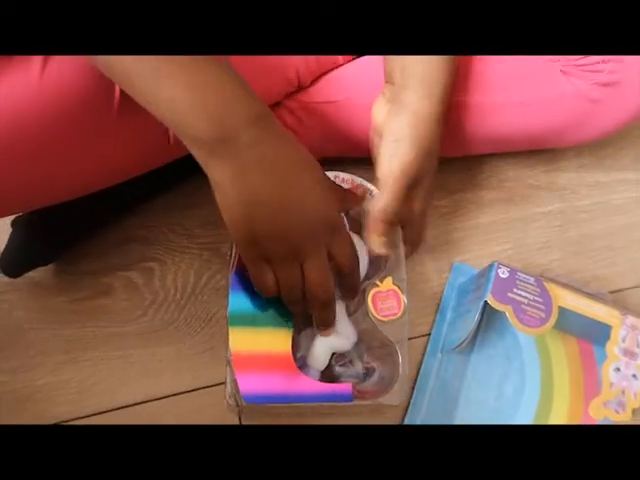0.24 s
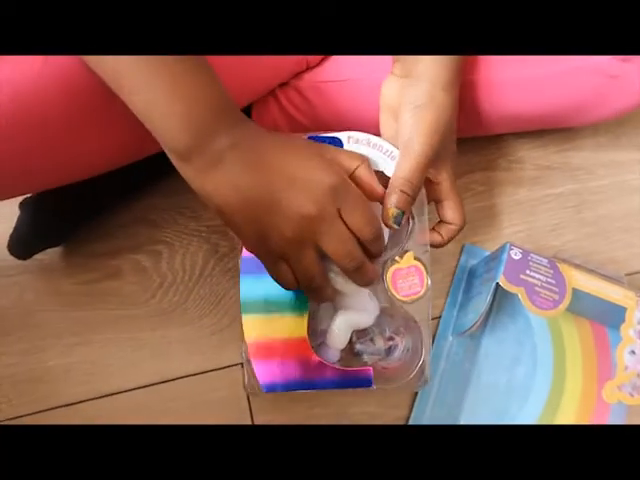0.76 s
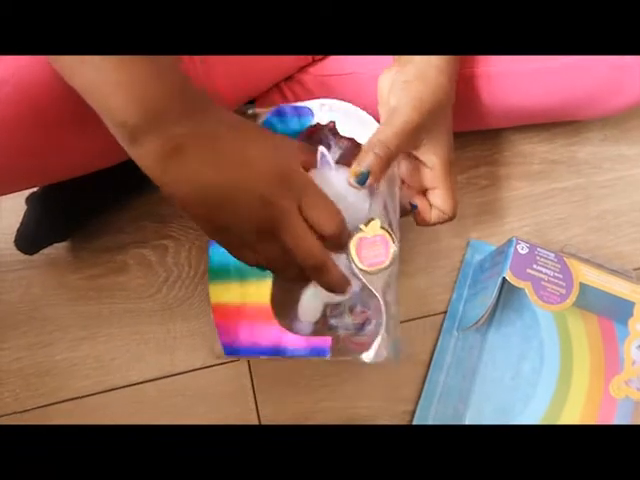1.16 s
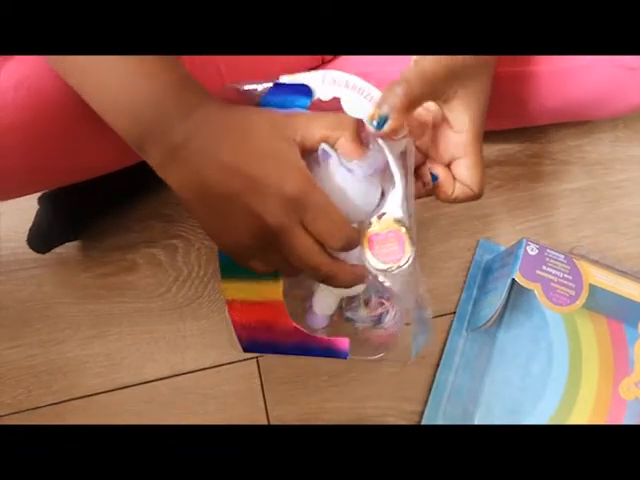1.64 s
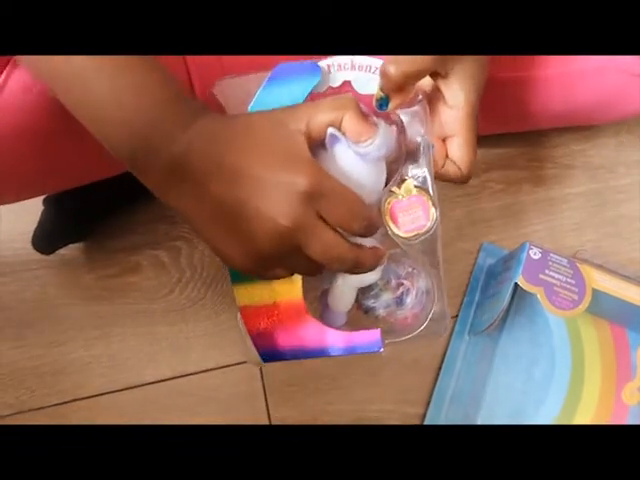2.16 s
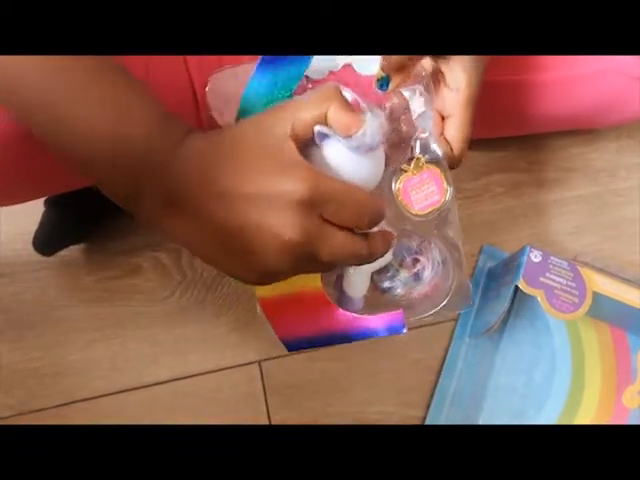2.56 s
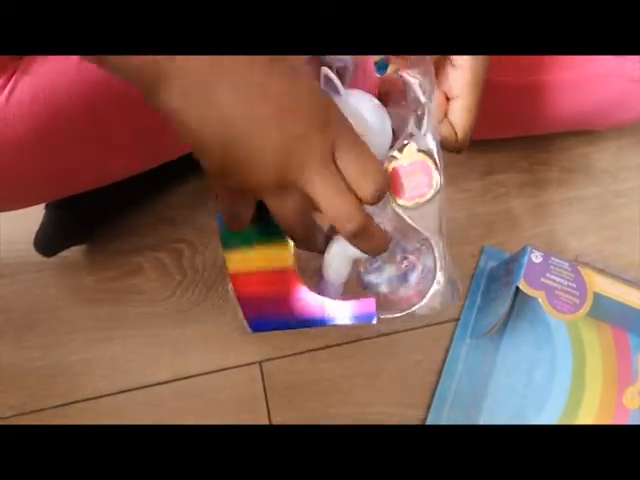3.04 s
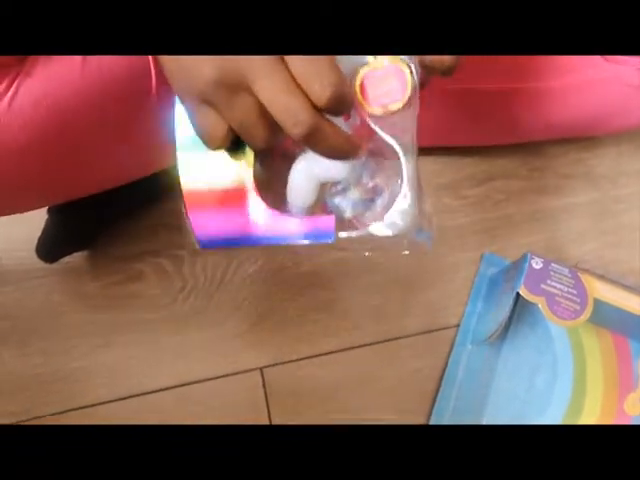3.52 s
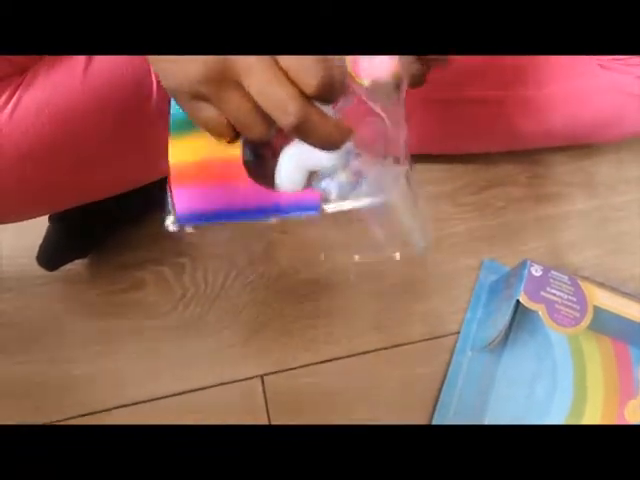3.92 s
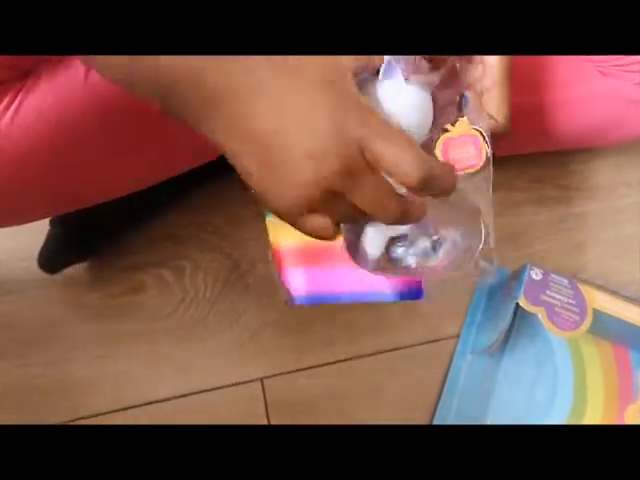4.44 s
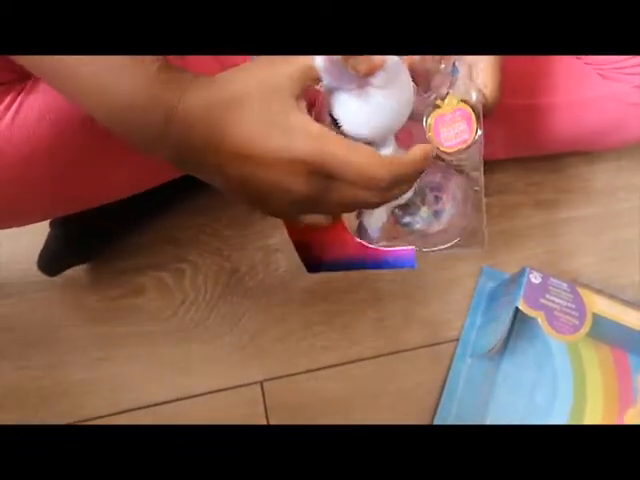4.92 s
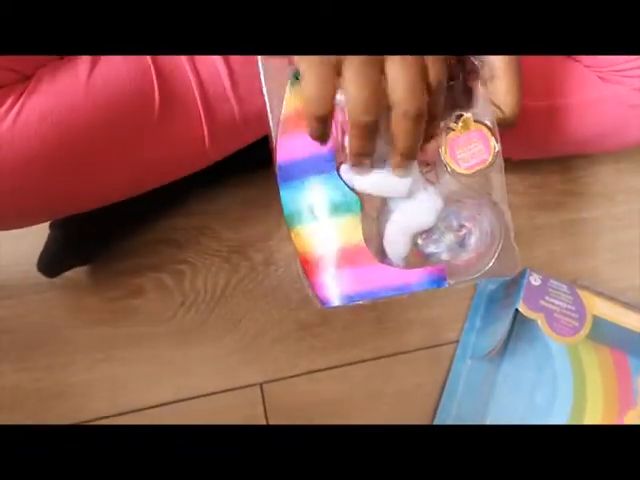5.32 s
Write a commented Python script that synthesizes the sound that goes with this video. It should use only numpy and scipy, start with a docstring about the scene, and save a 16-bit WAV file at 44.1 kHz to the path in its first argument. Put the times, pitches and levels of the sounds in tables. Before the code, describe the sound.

Stiff clear plastic packaging crackles, pops and crinkles close up as hands flex and squeeze it in a small hard-floored room.

```python
"""Hands work a stiff clear plastic tray close to a two-port microphone, in a small hard-floored room.
Air noise and rumble lie under it all; creaks (sticking slips) and rustle (ticking noise) come and go.
From 0.1 s the sheet buckles, each time a ringing thump, a torn crack and a sizzle, some in small flurries;
a ratchet of even buckles runs at 0.8 s, hard snaps overload the input near 1.1 and 2.0 s, and damped rim
modes scrape at 2.4 s. Buckles crowd from 3 to 4.6 s, the rim scrapes again, and the last buckles thin out."""
import sys
import numpy as np
from scipy import signal
from scipy.fft import rfft, irfft, next_fast_len
from scipy.io import wavfile
from scipy.ndimage import map_coordinates

SR = 44100
rng = np.random.default_rng(int(sys.argv[2]) if len(sys.argv) > 2 else 0)


def unload_audio(sound):
    """Save the sound as a 16-bit wav file, at the path given as the first command line argument."""
    columns = np.transpose(np.atleast_2d(sound))
    # keep every value between -1 and 1, then stretch to whole-number steps
    steps = np.round(np.clip(columns, -1, 1) * 32767)
    wavfile.write(sys.argv[1], SR, steps.astype(np.int16))


N = 246078
RISE_S = .00035  # time constant of the onset of buckles and rim slips


def amp(db):
    """Decibels to gain."""
    return 10 ** (np.asarray(db) / 20)


def unit(x):
    """Scaled to rms 1."""
    return x / np.sqrt(np.mean(x ** 2) + 1e-20)


def along(points, hz):
    """Values between (frequency, value) points on a log frequency axis."""
    f, v = np.transpose(points)
    return np.interp(np.log(hz + 1e-9), np.log(f), v)


def curves(rows):
    """One value per sample for each column after the time."""
    s, *cols = np.transpose(rows)
    return [np.interp(np.arange(N) / SR, s, c) for c in cols]


def filtered(x, response):
    """x times a complex response of frequency."""
    m = next_fast_len(x.shape[-1] + 8192)
    spectrum = rfft(x, m) * response(np.fft.rfftfreq(m, 1 / SR))
    return irfft(spectrum, m)[..., :x.shape[-1]]


def noise(spectrum, shape):
    """Coloured noise of rms 1."""
    return unit(filtered(rng.standard_normal(shape), lambda hz: amp(along(spectrum, hz))))


def onset(t):
    """Smooth start of a burst, from 0 towards 1."""
    return (1 - np.exp(-t / RISE_S)) ** 2


# colour of the air noise in the room: (frequency [Hz], relative density [dB])
AIR_COLOUR = [(200, -3.5), (400, -1.5), (1700, -21), (5000, -21.5), (12000, -31.5), (16000, -39)]
# low rumble under the handling: (time [s], level [dB])
RUMBLE_LEVEL = [(0, -48.5), (1.9, -55.5), (2.1, -60), (3.2, -56.5), (3.8, -55), (4.3, -54), (4.6, -81),
                (5.58, -53)]


def room_tone():
    """Steady air noise and a low rumble that comes and goes, both as filtered noise."""
    rumble_colour = [(10, -31), (30, 4.0), (120, 1.5), (200, -3.0), (300, -20.0), (1000, -88.0)]
    rumble = noise(rumble_colour, (2, N))
    air = amp(-57.5) * noise(AIR_COLOUR, (2, N))
    return air + amp(curves(RUMBLE_LEVEL)[0]) * rumble


# how long the small hard-floored room rings: (frequency [Hz], time to fall 60 dB [s])
ROOM_DECAY = [(200, 0.054), (600, 0.17), (3000, 0.33), (7000, 0.21), (12000, 0.071)]


def room(x, delay):
    """Each frequency dies at its own speed; every stretch of sound meets a slightly different room."""
    out, step = np.zeros((2, N + SR)), SR // 8
    for start in range(0, N, step):
        hz, t, z = signal.stft(rng.standard_normal((2, SR // 3)), SR, nperseg=256)
        decay = amp(-60 * t / along(ROOM_DECAY, hz)[:, None])
        tail = signal.istft(z * decay, SR, nperseg=256)[1]
        tail = tail / np.linalg.norm(tail[0])
        wet = signal.fftconvolve(x[:, start:start + step], tail, axes=1)
        out[:, start + round(delay * SR):][:, :wet.shape[1]] += wet
    return out[:, :N]


def slips(rate, spread_db):
    """Random impulses, rate a second, a few much larger than the rest."""
    hit, size, sign = rng.random((3, N))
    return unit((hit < rate / SR) * amp(-spread_db * np.log(size + .02)) * np.sign(sign - .5))


# hands on the tray: (time [s], relative creak level [dB], relative rustle level [dB])
GRIP_LEVELS = [(0.0, -100, -62), (0.16, -34, -36), (0.44, -41.5, -47.5), (0.63, -40.5, -40),
               (0.78, -44.5, -59), (0.97, -39.5, -38.5), (1.1, -45.5, -53), (1.4, -39, -44),
               (1.58, -50.5, -55), (1.7, -48.5, -48), (2.01, -50, -46), (2.36, -44, -49),
               (2.47, -52.5, -51), (2.57, -39.5, -60), (2.72, -38, -50), (2.86, -37, -43.5),
               (2.96, -51, -47), (3.1, -39.5, -38.5), (3.24, -37, -43), (3.31, -39.5, -46),
               (3.42, -53, -46), (3.6, -43.5, -65), (3.82, -38.5, -62.5), (4.03, -36.5, -24.5),
               (4.15, -43.5, -44), (4.21, -36.5, -43), (4.25, -39, -44.5), (4.43, -43.5, -64),
               (4.53, -34, -44.5), (4.74, -62, -64), (4.9, -57, -59), (5.01, -51, -56), (5.08, -40, -44),
               (5.58, -46, -54)]
# resonances of the tray under the fingers: (frequency [Hz], width [Hz], relative level [dB])
TRAY_MODES = [(353, 200, 9), (750, 390, 5.5), (1596, 240, 1), (2680, 2000, -15)]
# colour of the rustling sheet: (frequency [Hz], relative density [dB])
RUSTLE_COLOUR = [(1000, -6), (2000, -5.5), (3000, -7), (5000, -18), (8000, -24), (12000, -32), (16000, -39)]


def fingers():
    """Skin sticks and slips in clumps: low creaks through the tray, fine ticks from the sheet."""
    creak_db, rustle_db = curves(GRIP_LEVELS)
    # slow random drag, 40 points a second
    drag = map_coordinates(rng.standard_normal(N * 40 // SR + 4), [np.arange(N) * 40 / SR])

    def tray_and_skin(f):
        tray = sum((-1) ** k * amp(db) * 1j * f * width / (centre ** 2 - f * f + 1j * f * width)
                   for k, (centre, width, db) in enumerate(TRAY_MODES))
        return tray / (1 + 1j * f / 3500) ** 2  # fingertips are soft

    creak = filtered(slips(rate=600 * amp(3.3 * drag), spread_db=2.0), tray_and_skin)
    creak = unit(amp(3 * drag) * creak)
    tick_hits = np.abs(slips(rate=200 * amp(4.3 * drag), spread_db=8.0))
    ticks = np.convolve(tick_hits, np.hanning(130), "same")  # each window spans 3 ms
    rustle = (unit(ticks) + 2.9) * noise(RUSTLE_COLOUR, (2, N))
    rustle = unit(amp(2.4 * drag) * rustle)
    return amp(creak_db + 5.0) * creak + amp(rustle_db - 2.5) * rustle


# runs of rim slips: (mean slope of the modes [dB per octave], slips as (time [s], relative level [dB]))
RIM_SLIPS = [(-3, [(2.396, -30), (2.43, -25), (2.45, -24), (2.464, -38), (2.471, -27), (2.489, -23),
             (2.5035, -29), (2.522, -24)]), (-7.5, [(4.7761, -23.5), (4.784, -22), (4.793, -24),
             (4.831, -23), (4.8417, -23), (4.85, -19), (4.857, -27), (4.8646, -25), (4.87, -25),
             (4.876, -20), (4.886, -16.5), (4.894, -21), (4.9057, -23), (4.912, -24), (4.92, -20),
             (4.9355, -22), (4.942, -20), (4.9465, -22), (4.95, -33), (4.955, -23), (4.96, -26),
             (4.965, -43), (4.97, -25), (4.976, -36)])]
# damped modes of the rim: (nominal frequency [Hz], relative level [dB], time to fall 60 dB [s])
RIM_MODES = [(724, 4.5, 0.0071), (1770, -9, 0.02), (2430, -3.5, 0.0083), (3810, -0.5, 0.0064)]


def rim():
    """Each slip rings the same damped modes, a little detuned, the upper ones varying in level."""
    out, t = np.zeros(N), np.arange(1024) / SR
    hz, level_db, t60 = np.transpose(RIM_MODES)[:, :, None]
    octaves = np.log2(hz / hz[0])
    for slope_db, rows in RIM_SLIPS:
        lots = rng.standard_normal((len(rows), 2, len(RIM_MODES), 1))
        for (s, db), (tilt, detune) in zip(rows, lots):
            mode_db = db + 6 + level_db + octaves * (slope_db + tilt)
            gain = amp(mode_db - 60 * t / t60) * onset(t)
            modes = gain * np.sin(2 * np.pi * hz * (1 + .03 * detune) * t)
            out[round((s - .001) * SR):][:len(t)] += np.sum(modes, axis=0)
    return out


# a rim juddering past: (first time [s], end time [s], gap [s], relative thump level [dB], swell [dB],
# crack over thump [dB], sizzle over thump [dB], hollow pitch [Hz], crack centre [Hz])
RATCHET_RUNS = [(0.8165, 0.905, 0.0277, -30, 8, 7, -18, 850, 1700)]


def ratchets():
    """Runs of nearly evenly spaced small buckles that swell or fade."""
    judder_s, judder_db = 0.0008, 1  # random spread of time and level
    rows = []
    for first, last, gap, db, swell_db, *colour in RATCHET_RUNS:
        lot = rng.standard_normal((32, 2))
        for s, (late, size) in zip(np.arange(first, last, gap), lot):
            swollen_db = db + swell_db * (s - first) / (last - first)
            rows.append((s + judder_s * late, swollen_db + judder_db * size, *colour))
    return rows


# folds collapsing: (middle time [s], length [s], mean relative thump level [dB],
# mean crack over thump [dB], mean sizzle over thump [dB], nominal hollow pitch [Hz])
FOLDS = [(0.192, 0.08, -34.5, -9, -8, 856), (0.302, 0.045, -22.5, -10, -13.5, 977),
         (0.56, 0.054, -20.5, -12, -24, 883), (0.621, 0.083, -27.5, -1, -12, 430),
         (0.956, 0.086, -27.5, -24, -38, 702), (1.635, 0.039, -33, -17, -20, 762),
         (1.708, 0.05, -21.5, -4.5, -22, 883), (2.864, 0.059, -27, -8, -40, 714),
         (3.134, 0.026, -51, 19, 8, 765), (3.231, 0.062, -28.5, -1, -10.5, 756),
         (3.424, 0.053, -25, -10, -33, 592), (3.989, 0.054, -35, 6.5, 4.5, 595),
         (5.096, 0.041, -23.5, -9, -23, 702), (5.15, 0.024, -29.5, 3, -11, 867),
         (5.303, 0.05, -30.5, -13.5, -24, 715), (5.499, 0.071, -28.5, -10, -20, 750)]


def crinkles():
    """A fold collapses in a flurry of small buckles at chance times, levels and pitches."""
    flurry, crack_hz = 18, 2480  # buckles per fold, nominal crack centre
    spread_db, spread_pitch = 2.5, 0.12  # pitch spread as a log ratio
    rows = [(s + length * (u - .5), *rest) for s, length, *rest in FOLDS for u in rng.random(flurry)]
    s, *levels, hollow_hz = np.transpose(rows)
    lot = rng.standard_normal((len(rows), 5)).T
    pitch = np.array([hollow_hz, np.full(len(s), crack_hz)]) * np.exp(spread_pitch * lot[3:])
    return list(np.vstack([s + .001, levels + spread_db * lot[:3], pitch]).T)


# single buckles: (peak time [s], relative thump level [dB], crack over thump [dB],
# sizzle over thump [dB], pitch of the bent hollow [Hz], crack centre [Hz])
SHEET_BUCKLES = [(0.108, -17, -6, -19, 700, 1950), (0.123, -19, -16, -14, 854, 1880.0),
                 (0.148, -23, 2.5, -22, 1050, 1750.0), (0.21, -49.5, 29, -17, 830, 2030),
                 (0.297, -20, -18, -21, 990, 1690), (0.309, -3, -3.5, -2, 955, 3360),
                 (0.401, -17.5, -5, -28, 805, 1650.0), (0.493, -19.5, -1, -12, 726, 2550),
                 (0.505, -16, -6.5, -16.5, 954, 1950), (0.584, -5.5, 0.5, -13, 430, 2900),
                 (0.603, -8.5, -14, -27, 420, 1880.0), (0.613, -24, -10, -23, 407, 2000),
                 (0.632, -12, -6.5, -23, 770, 1720), (0.719, -17.5, -9.5, -17, 737, 3080),
                 (0.879, -26, -22, -41, 743, 4300), (0.922, -22.5, -7, -62, 870, 3950),
                 (0.936, -14, -22, -39, 740, 2090.0), (0.981, -14.5, -18, -36, 710, 3500),
                 (1.012, -15.5, -13, -24, 525, 1860.0), (1.0942, -30, 18, 5, 860, 2900),
                 (1.0955, 4.5, -2.5, -10.5, 697, 2400), (1.0975, -17, -16, 8.5, 600, 2550),
                 (1.251, -29, 5.5, -28, 800, 2500), (1.286, -29.5, 7.5, -5, 763, 2400),
                 (1.301, -24, 5, -11, 995, 2230), (1.373, -22, -19, -32, 775, 2190.0),
                 (1.394, -18.5, -12, -2.5, 560, 2200.0), (1.401, -12.5, -6, -16, 906, 2600),
                 (1.439, -5, -2.5, -21, 721, 2390), (1.694, -16, 8, -13, 1093, 2900),
                 (1.707, -9.5, -14, -5.5, 954, 2620.0), (1.731, -35, -8, -30, 730, 2170),
                 (1.888, -26.5, 0.5, -7.5, 800, 2850), (1.937, -11.5, -1, -20, 683, 2900),
                 (1.933, -31.5, 0, -26, 665, 2020), (1.975, -20, -14, -25, 750, 2000),
                 (1.982, -42, 14, 0, 800, 3000), (1.9875, -5, 9, -7, 772, 1600),
                 (1.987, -1.5, 9, -1, 882, 3270), (2.087, -22, -4, -30, 654, 2000),
                 (2.122, -25, 15, -7.5, 1180, 1580), (2.133, -24, 6.5, -26, 990, 2830),
                 (2.187, -24.5, 1, -32, 750, 1850), (2.208, -33, 5, -28, 780, 2530),
                 (2.231, -25, -6, -30, 980, 1920), (2.264, -7.5, 7.5, -6, 597, 2900),
                 (2.402, -22.5, -1.5, -11, 750, 3240), (2.549, -21, -3, -11, 717, 2120),
                 (2.587, -25.5, 7.5, -8, 690, 2600), (2.61, -6, 4.5, -11.5, 914, 2960),
                 (2.693, -10, -6, -17, 520, 1800), (2.741, -20.5, -10, -34, 620, 1890.0),
                 (2.766, -10, -5, -27, 567, 2120), (2.797, -9, -10.5, -32, 827, 2010.0),
                 (2.866, -17, -6, -30, 720, 2220), (2.88, -22.5, 6, -28, 760, 2320),
                 (2.887, -13, 1, -2, 680, 2320), (2.958, -29, 0, -9, 634, 2410),
                 (2.981, -25, -14, -27, 850, 2000), (3.0, -20, 3, -29, 670, 3200),
                 (3.025, -8.5, -3, -29, 612, 1830), (3.041, -31.5, 16, 7, 780, 2550),
                 (3.057, -18.5, -5, 2, 650, 2570), (3.068, -17, 0, -18, 840, 2140.0),
                 (3.145, -34.5, 21.5, 18, 1090, 2740), (3.155, -1, -6.5, -21.5, 535, 1650),
                 (3.169, -10.5, -1.5, -14, 860, 1790), (3.199, -17.5, 1, -3.5, 850, 2500),
                 (3.203, -26, 23.5, 11, 1040, 2300), (3.252, -37, 12, -15, 785, 2800),
                 (3.266, -23, 8, -21, 636, 2660), (3.325, -28, -13, -23, 610, 1800),
                 (3.34, -15.5, -2, -11, 696, 2660), (3.359, -12.5, -3, -32, 448, 2640),
                 (3.395, -19, 0, -8.5, 680, 3030), (3.41, -13, -6, -10, 710, 2460),
                 (3.425, -22, -1, -15, 557, 2160), (3.461, -17, -13, -6, 680, 3000),
                 (3.481, -21, -5, -28, 570, 1700), (3.466, -12, -5, -22, 644, 2840),
                 (3.497, -13.5, -9, -27.5, 563, 2320), (3.53, -16.5, -1, -17, 730, 2620),
                 (3.566, -15.5, -2, -27, 552, 1910.0), (3.578, -26, 11.5, -5.5, 920, 2500),
                 (3.618, -19, 1, -19.5, 700, 3080), (3.623, -6, -15, -34, 587, 2380),
                 (3.666, -12.5, 0, -33, 450, 1750), (3.679, -6.5, -7, -14, 700, 3300),
                 (3.688, -5.5, 8, -4, 1275, 1430), (3.772, -22.5, 4.5, -21, 474, 1710),
                 (3.808, -31, 2, -1.5, 880, 2510), (3.88, -30, 12, -20, 690, 1970),
                 (3.897, -30.5, -9, 13, 800, 3000), (3.96, -22, -6, -5, 725, 2500),
                 (4.004, -9.5, -14, -44, 177, 2020), (3.847, -31.5, 14.5, -27, 660, 1610),
                 (3.889, -10, 8, -19.5, 716, 2700), (3.929, -9, -1.5, -15.5, 1564, 1650),
                 (3.952, -11.5, 4.5, -15, 530, 2050), (4.001, -8, -6, -14, 410, 1980),
                 (4.009, -14.5, 6.5, 6.5, 1110, 1540), (4.019, -6.5, 1, -4.5, 827, 2140),
                 (4.026, -5, -3.5, -3, 673, 2450), (4.1005, -20.5, 7.5, 0, 804, 2880),
                 (4.108, -14, -5, -37, 480, 1800), (4.117, -21, 17.5, 3.5, 780, 2860),
                 (4.167, -33, 20, 22, 700.0, 4970), (4.196, -17, -21, -21, 607, 1920.0),
                 (4.214, -24, -10, -38, 720, 1800), (4.232, -27, -3, -2, 710, 3000),
                 (4.256, -29.5, 22, 15.5, 1120, 3680), (4.267, -8.5, 2, -37, 480, 1940),
                 (4.299, -14, 19, 15.5, 790, 2250), (4.31, -35.5, 28, -16, 830, 1910),
                 (4.406, -24.5, -11, -30, 405, 2000), (4.361, -11.5, 3.5, -32, 852, 1970),
                 (4.446, -18, 12.5, -9, 916, 2110), (4.463, -13, 9.5, -17, 860, 2560.0),
                 (4.487, -36.5, 25, -25, 930, 2280), (4.497, -21, 16, -23, 1140, 3000),
                 (4.501, -8, 6, -1, 585, 2720), (4.533, -8.5, 3, -8, 508, 3360),
                 (4.547, -11, 4, -9.5, 634, 2250), (4.575, -22.5, 2, 0.5, 645, 2180),
                 (4.598, -19.5, -8, -31, 579, 2000), (4.769, -43.5, 11, 2, 810, 2470),
                 (4.884, -28, 3.5, -26, 734, 2400), (4.676, -28.5, -23.5, -29, 883, 1768),
                 (4.911, -34.5, 11.5, -30, 740, 3300), (4.963, -23, 2, -19, 585, 3000),
                 (5.04, -8, -5, -19, 632, 2350), (5.055, -8.5, 5, -10.5, 698, 2460),
                 (5.09, -15, -10, -38, 684, 2300.0), (5.119, -18.5, 15, -10, 876, 3400),
                 (5.153, -15.5, -10, -17, 870, 2340), (5.299, -16.5, -10, -23, 696, 2800),
                 (5.312, -27, 1, -18.5, 730, 3440), (5.383, -31, -2, -13, 890, 2540),
                 (5.552, -25.5, -24, -32, 590, 2000), (5.402, -22, 5.5, -7, 887, 1800),
                 (5.467, -28, -5, -35, 810, 3050)]
# modes of the hollow: (multiple of its pitch, mean relative level [dB], relative decay time)
HOLLOW_MODES = [(1, 5, 0.0075), (1.5, -11, 0.027), (2.2, -17, 0.046), (.58, -9.5, 0.022), (.25, -20, 0.035)]
# colour of the crack: (multiple of its centre, relative density [dB])
CRACK_COLOUR = [(.3, -2), (.6, -2.5), (1, 8.5), (1.6, -6.5), (2.5, -21.5), (4, -66)]
# colour of the sizzle: (frequency [Hz], relative density [dB])
SIZZLE_COLOUR = [(3000, 1.5), (5000, 1), (6300, 0.5), (9000, -7.5), (12000, -9), (16000, -25.5)]


def buckles():
    """The hollow rings for a few cycles; the crease tears out a crack and a sizzle.
    Returns the sum and difference of the ports, and what the walls hear: mostly one smooth pulse,
    since they hear the crease from all sides."""
    out, walls, t = np.zeros((2, N + SR)), np.zeros(N + SR), np.arange(2048) / SR
    sizzle, grid = noise(SIZZLE_COLOUR, out.shape), np.fft.rfftfreq(len(t), 1 / SR)
    events = list(SHEET_BUCKLES) + crinkles() + ratchets()
    scatter = rng.standard_normal((len(events), len(HOLLOW_MODES)))
    white = rng.standard_normal((len(events), 2, len(t)))

    def burst(rise, t60):
        shape = (1 - np.exp(-t / rise)) ** 2 * amp(-60 * t / t60)
        return shape / shape.max()

    def pulse(gain):
        return np.roll(irfft(gain / np.sqrt(np.mean(gain ** 2))), 128)

    def steady(x):  # even level near the snap
        return x / np.sqrt(np.mean(x[:, 20:130] ** 2, axis=1, keepdims=True))

    shiver = amp(-20) * burst(0.0015, 0.05)  # the sheet keeps trembling after it snaps
    sizzle_pulse = pulse(amp(along(SIZZLE_COLOUR, grid) - 80 * (grid < SIZZLE_COLOUR[0][0])))
    for (s, db, crack_db, sizzle_db, hz, crack_hz), lot, tear in zip(events, scatter, white):
        start = round((s - .001) * SR)  # the burst peaks shortly after the crease gives way
        at = slice(start, start + len(t))
        long = amp(0.061 * (db + max(crack_db, 0) + 19))  # a bigger panel takes longer to flip
        ring = np.zeros(len(t))
        for (multiple, level, decay), vary in zip(HOLLOW_MODES, amp(2.5 * lot)):
            mode = np.sin(2 * np.pi * multiple * hz * t)
            ring += vary * amp(level) * burst(RISE_S, long * decay * 1.89) * mode
        thump = amp(db - 6.0) * ring

        snap = onset(t) * amp(-60 * (t / (long * 0.0071)) ** 2)  # holds, then stops short
        crack_gain, sizzle_gain = amp(db + crack_db - 7.0), amp(db + sizzle_db - 7.5)
        torn = steady(irfft(rfft(tear) * amp(along(CRACK_COLOUR, grid / crack_hz))))
        crease = crack_gain * (snap + shiver) * torn
        crease = crease + sizzle_gain * (snap + amp(-0.5) * shiver) * steady(sizzle[:, at])
        out[:, at] += thump + crease

        # away from the crease the crack is broader (square root) and centred lower
        wide_crack = np.sqrt(amp(along(CRACK_COLOUR, grid / (0.75 * crack_hz))))
        smooth = crack_gain * pulse(wide_crack) + sizzle_gain * sizzle_pulse
        walls[at] += amp(0.5) * thump + amp(-4.5) * np.linalg.norm(snap) * smooth + crease[0] / 4
    return out[:, :N], walls[:N]


def radiated(x):
    """The tray is too small to radiate deep bass: a third-order cut."""
    bass_cut_hz = 172
    return filtered(x, lambda hz: (1j * hz / (1j * hz + bass_cut_hz)) ** 3)


# two close microphone ports: (frequency [Hz], gain of the difference signal [dB])
PORT_DIFFERENCE = [(70, -36), (160, -13), (600, -35), (1500, -18), (3000, -13.5), (6000, -9.5), (10000, -4)]


def scene():
    """Two close ports: their difference is weakest in the deepest bass and around 600 Hz,
    and grows towards the treble."""
    near, walls = buckles()
    skin = fingers() + rim()
    direct = radiated(near + skin)
    reflected = amp(-12.0) * room(radiated(walls + skin), delay=0.008)
    mid, side = direct + reflected + room_tone()
    # a pressure difference leads by a quarter cycle
    side = filtered(side, lambda hz: 1j * amp(along(PORT_DIFFERENCE, hz)))
    return np.array([mid + side, mid - side])


def record(dry):
    """The microphone input saturates towards full scale, then keeps nothing above its band limit."""
    top_hz = 16300
    clipped = dry / (1 + np.abs(dry) ** 8) ** (1 / 8)
    return filtered(clipped, lambda hz: hz < top_hz)


dry = scene()
out = record(dry)
unload_audio(out)
```